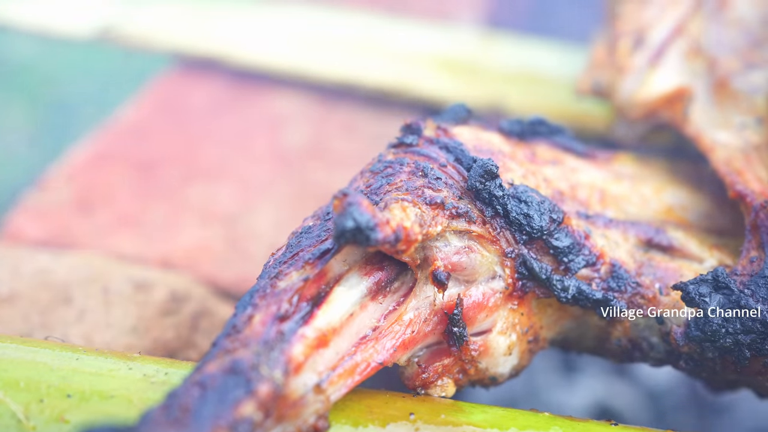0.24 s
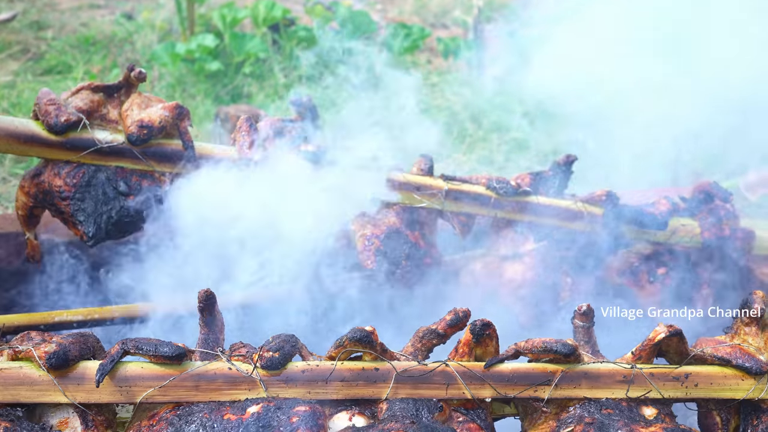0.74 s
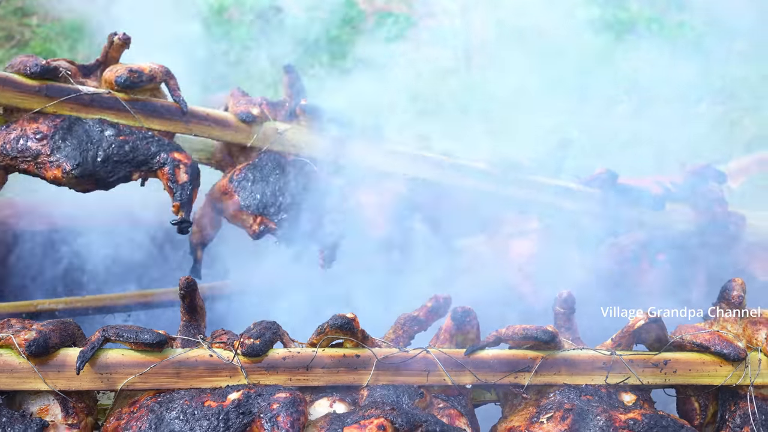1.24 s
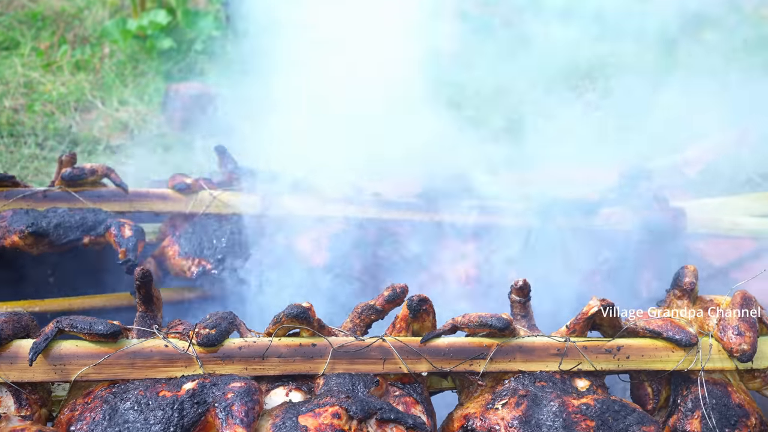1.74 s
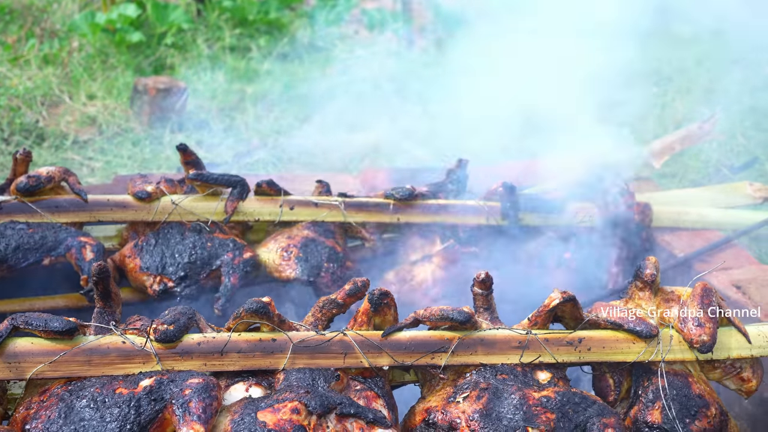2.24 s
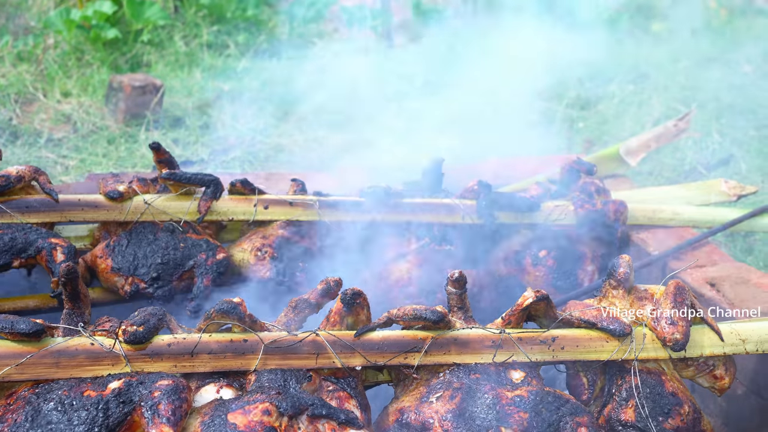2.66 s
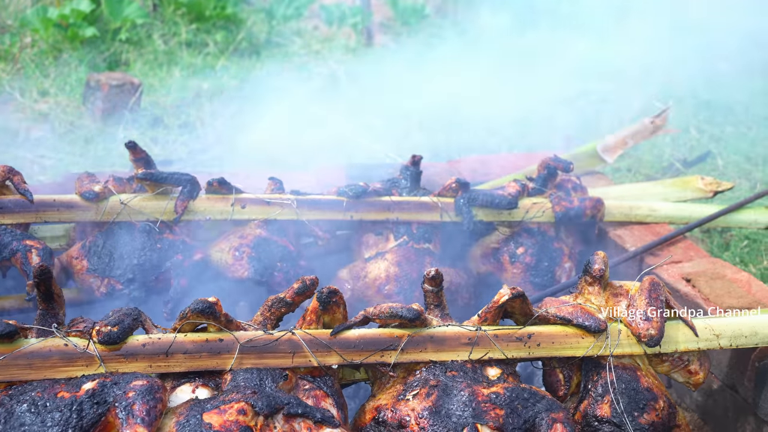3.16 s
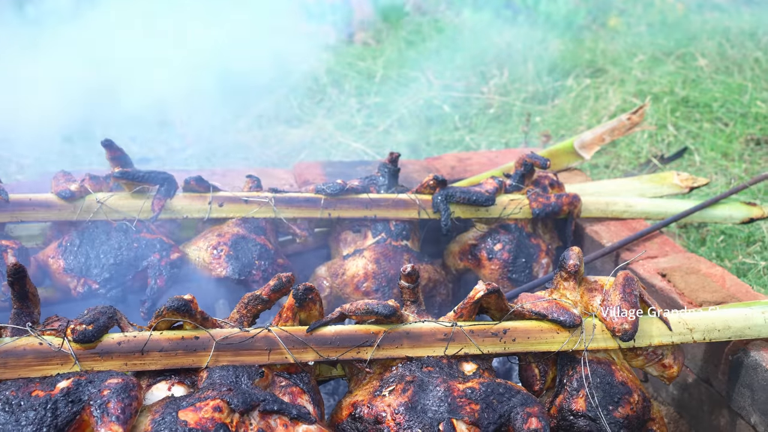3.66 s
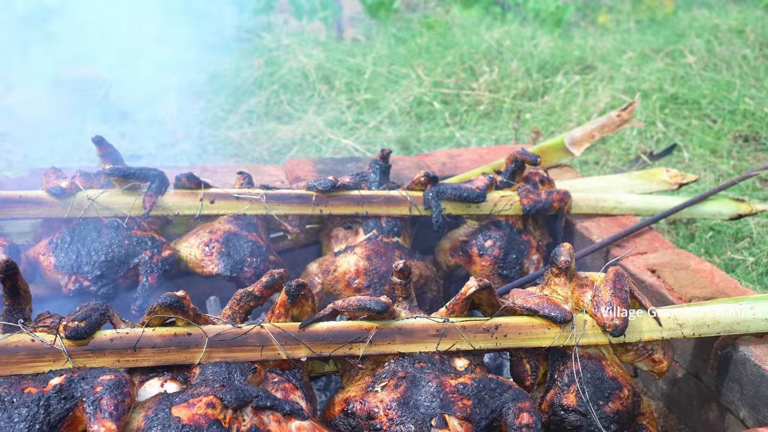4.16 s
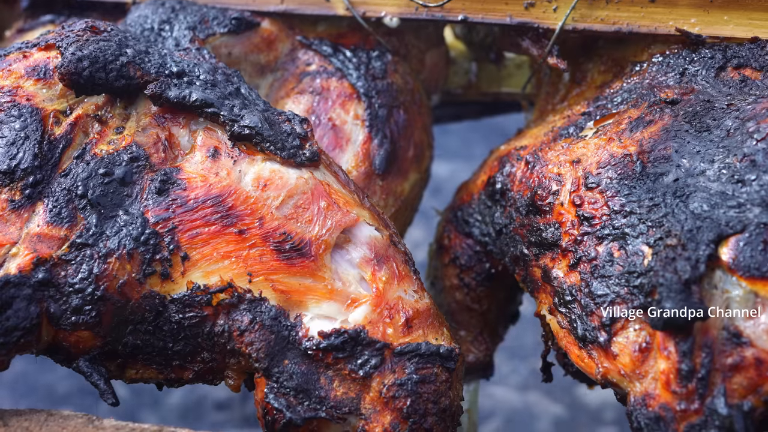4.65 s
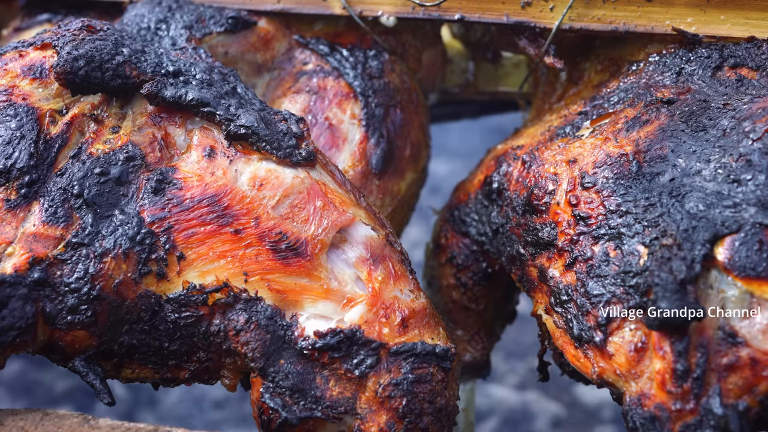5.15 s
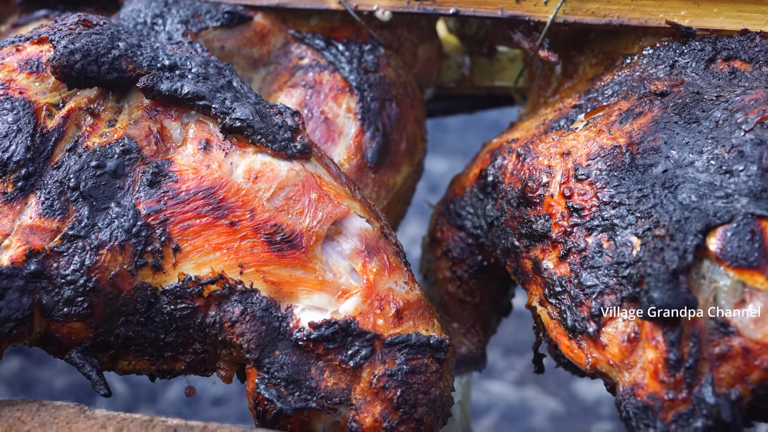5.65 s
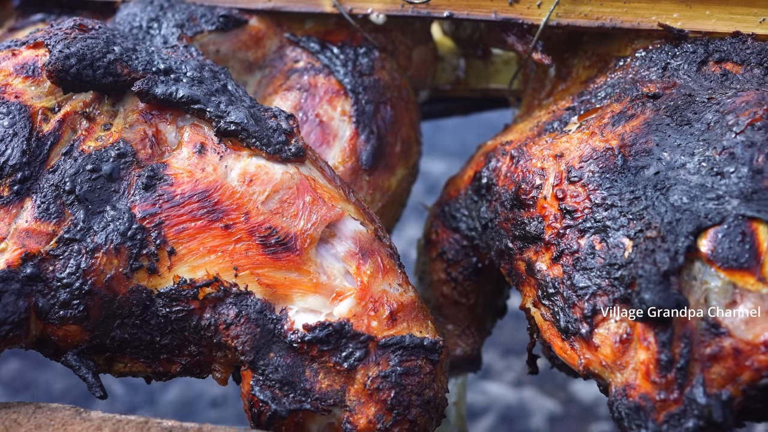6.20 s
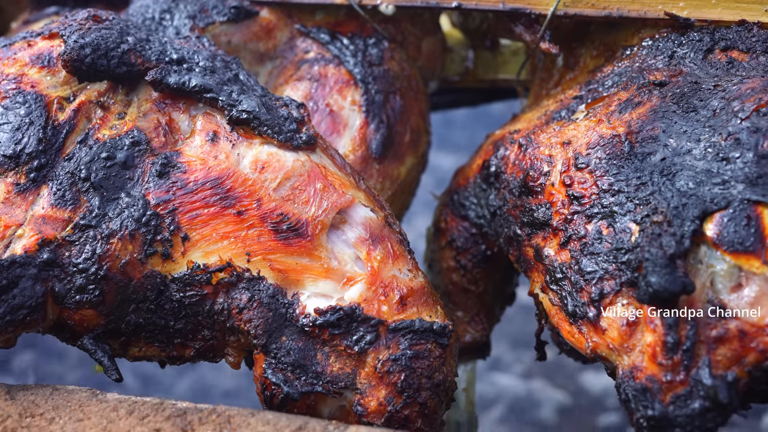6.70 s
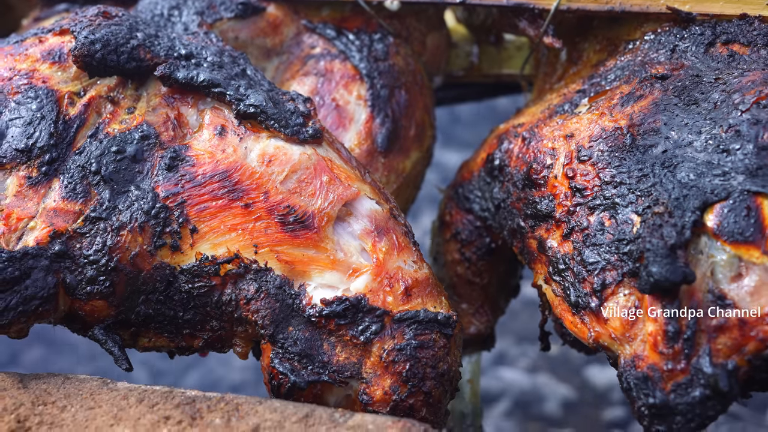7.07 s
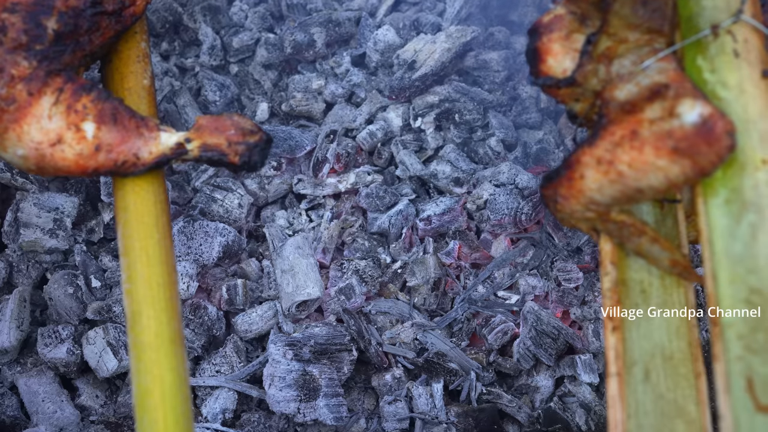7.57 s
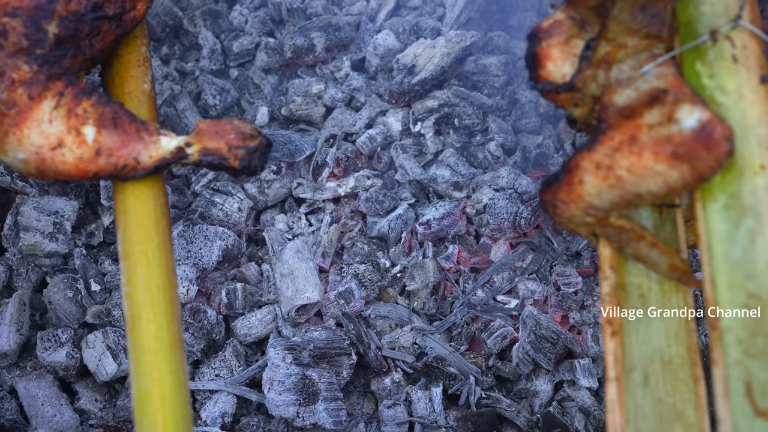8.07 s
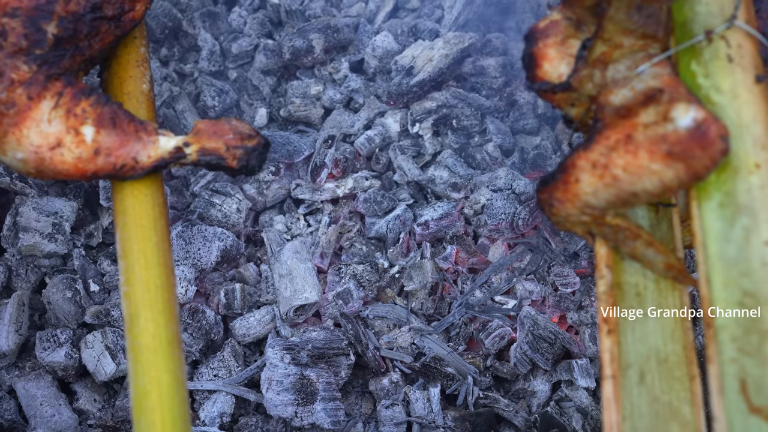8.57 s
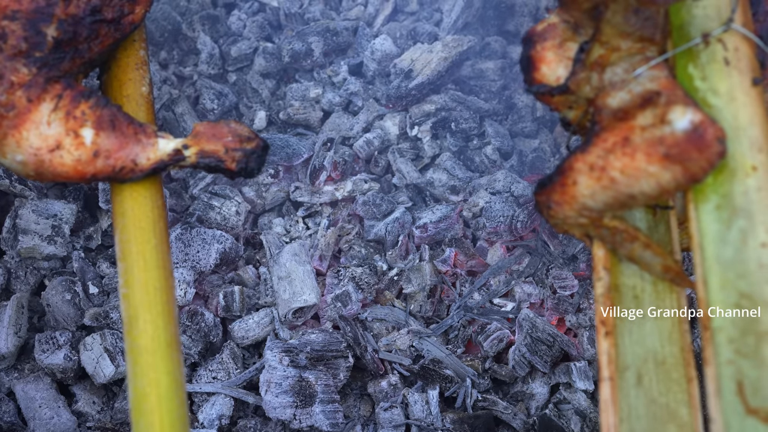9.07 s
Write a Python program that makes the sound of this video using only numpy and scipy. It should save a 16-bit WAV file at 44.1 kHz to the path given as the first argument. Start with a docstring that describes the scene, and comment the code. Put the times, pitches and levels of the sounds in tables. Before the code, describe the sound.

Outdoors, close to chickens roasting over charcoal, fat and juice sizzle without pause: a crisp, flickering hiss filled with tiny crackles. From 0 to 0.65 s it is moderate, with a dense run of snapping pops and low wind rumble. At 0.65 s it abruptly becomes a little quieter and thinner, with sparser pops; around 3 s brighter spits cluster and the fizz flares, while wind gusts thicken to 4 s. At 4.2 s a louder, fuller sizzle cuts in, with a brief rough, wet bubbling spatter near 4.7 s, sharp snaps and short surges around 5.9 to 6.2 s, under strong buffeting. A bright, hard pop lands near 7.2 s. At 7.3 s a soft low thump marks the last change, to a lower-level but fizzier sizzle with frequent pops, a surge at 7.8 s and a sharp snap near 8.9 s. Wind rumbles on, easing by 9.3 s.

```python
"""Fat and juice boil on chickens roasting over charcoal outdoors, heard from four spots in turn.
The sizzle is hiss plus tiny crackling bursts, flickering octave by octave and coloured anew at each spot.
Louder pops are clicks with an echo and a noisy tail; one spatter of juice is rough, loosely pitched bursts.
Wind buffets the microphone: a low rumble and a faster flutter of shaped noise.
One soft low thump, a short smooth pulse, falls at the cut to the last spot."""
import sys
import numpy as np
from scipy import signal
from scipy.fft import rfft, irfft, next_fast_len
from scipy.io import wavfile
from scipy.ndimage import uniform_filter1d

SR = 44100
rng = np.random.default_rng(int(sys.argv[2]) if len(sys.argv) > 2 else 0)


def dump(signal):
    """Clip the signal to [-1, 1] and save it as 16-bit WAV at the path in sys.argv[1]."""
    limited = np.clip(np.atleast_2d(signal).T, -1, 1)
    pcm = np.round(limited * 32767).astype(np.int16)
    wavfile.write(sys.argv[1], SR, pcm)


N = 411894

# When each spot begins, then the end: (time [s])
SPOT_TIMES = [0, .648, 4.233, 7.317, 9.35]
SNAP_HZ = [2500, 7000]   # the middle band, in which sizzle and snaps are levelled


def from_db(db):
    """Decibels to gain."""
    return 10 ** (np.asarray(db) / 20)


def rms_one(x):
    """Scaled to unit rms."""
    return x / np.sqrt(np.mean(x ** 2) + 1e-20)


def evened(x, size):
    """Divided by its own slow level, smoothed twice over size samples."""
    power = uniform_filter1d(uniform_filter1d(x ** 2, size=size), size=size)
    return x / np.sqrt(power)


def in_time(rows):
    """Curve columns at every sample."""
    s, *columns = np.transpose(rows)
    return [np.interp(np.arange(N) / SR, s, c) for c in columns]


def bin_hz(size):
    """Frequencies of an FFT of that size, kept at 1 Hz or above."""
    return np.maximum(np.arange(size // 2 + 1) * SR / size, 1)


def coloured(x, spectrum):
    """Filtered to a spectrum drawn on a log-frequency axis."""
    size = next_fast_len(len(x))
    hz, db = np.transpose(spectrum)
    gain = from_db(np.interp(np.log(bin_hz(size)), np.log(hz), db))
    return irfft(rfft(x, size) * gain, size)[:len(x)]


def band(x, edges_hz):
    """Causal band-pass along the last axis."""
    return signal.sosfilt(signal.butter(2, edges_hz, "band", fs=SR, output="sos"), x)


def peak(x, hz, width_hz):
    """One resonance, gain 1 on top."""
    r, w = np.exp(-np.pi * width_hz / SR), 2 * np.pi * hz / SR
    return (1 - r * r) / 2 * signal.lfilter([1, 0, -1], [1, -2 * r * np.cos(w), r * r], x)


def drift(rate_hz):
    """Slow chance of spread 1: noise at every 40th sample through a double one-pole low-pass."""
    r = np.exp(-80 * np.pi * rate_hz / SR)
    noise = rng.standard_normal(N // 40 + 2002)
    slow = signal.lfilter([1], [1, -2 * r, r * r], noise)[2000:]   # the filter has settled by then
    return np.interp(np.arange(N) / 40, np.arange(len(slow)), rms_one(slow))


def crackle(per_s, spread_db, tail_s):
    """Random bursts of uneven size, each a puff of noise that dies fast; rms 1."""
    born = rng.random(N) < per_s / SR
    sizes = from_db(spread_db * np.minimum(rng.exponential(1, N), 2.5))
    decay = np.exp(-1 / (tail_s * SR))
    envelope = signal.lfilter([1], [1, -decay], born * sizes + 1e-18)
    return rms_one(envelope * rng.standard_normal(N))


def puffs(t60, noisy, echo_s):
    """One row a burst: a click, its echo off a nearby surface and a noisy tail."""
    t = np.arange(2048) / SR
    tails = np.exp(-np.log(1000) * t / np.maximum(t60, .002)[:, None])
    noise = rng.standard_normal((len(t60), len(t)))
    # each burst lies at its own distance: half to twice the echo time
    lags = (echo_s * SR * 2 ** np.tanh(noise[:, -1])).astype(int)
    rows = noisy * tails * noise
    rows[:, 0] -= 1
    rows[np.arange(len(t60)), lags] -= .6
    return rows


def laid_out(times, rows):
    """Each row placed at its moment."""
    out = np.zeros(N + rows.shape[1])
    for s, row in zip(times, rows):
        start = round(s * SR)
        out[start:start + len(row)] += row
    return out[:N]


def wind():
    """Slow pressure lumps on the microphone and a faster flutter, its level uneven within each gust."""
    # The gusts at the microphone: (time [s], buffeting level [dB], flutter level [dB])
    gusts = [(0.0, -24, -45), (0.08, -33.5, -45), (0.28, -18, -38.5), (0.57, -23.5, -40.5),
             (0.68, -30.5, -49), (0.76, -24.5, -49), (0.99, -40, -61), (1.38, -57, -62), (1.48, -30, -57),
             (1.6, -35, -62), (1.8, -21.5, -43), (2.13, -22.5, -45), (2.21, -46, -52), (2.31, -25.5, -49),
             (2.46, -29, -46), (2.53, -21.5, -36), (2.73, -22, -44), (2.96, -17.5, -40), (3.13, -40, -55),
             (3.23, -25, -43), (3.33, -12.5, -34), (3.41, -19, -42), (3.61, -18.5, -43), (3.72, -15, -33),
             (3.87, -28, -50), (4.0, -16.5, -49), (4.14, -22, -41), (4.26, -44, -55), (4.58, -52, -50),
             (4.66, -31, -51), (4.9, -54, -53), (5.03, -22, -45), (5.14, -42, -48), (5.23, -25, -47),
             (5.44, -33, -44), (5.56, -20, -37), (5.7, -25, -44), (5.83, -14, -28), (5.93, -14, -31),
             (6.03, -31, -30), (6.19, -10.5, -27.5), (6.35, -17, -40), (6.47, -33.5, -49),
             (6.8, -32.5, -46), (6.89, -15, -42), (7.16, -26, -49), (7.27, -20, -39), (7.44, -17, -41),
             (7.54, -26, -45), (7.67, -12, -35.5), (7.8, -17.5, -29.5), (7.95, -16.5, -39),
             (8.03, -22, -37), (8.14, -20, -37), (8.27, -24.5, -39), (8.4, -16, -33), (8.56, -29.5, -43),
             (8.76, -19.5, -42.5), (8.85, -32, -42), (8.96, -27, -52), (9.05, -35, -65), (9.34, -49, -56)]
    # Spectra of the rumble and of the flutter, before levelling: (frequency [Hz], relative level [dB])
    buffet_spectrum = [(2.9, -59), (5.0, 8), (21, 3.5), (30, -12.5), (55, -19.5), (72, -18), (120, -120)]
    flutter_spectrum = [(26, -30), (45, 5.5), (158, -15.5), (238, -28.5), (300, -42), (390, -66),
                        (660, -120)]
    buffet_db, flutter_db = in_time(gusts)
    buffet = evened(coloured(rng.standard_normal(N), buffet_spectrum), size=4000)
    flutter = evened(coloured(rng.standard_normal(N), flutter_spectrum), size=2500)
    eddies_db = 0.5 * drift(rate_hz=13)
    return from_db(buffet_db) * buffet + from_db(flutter_db + eddies_db) * flutter


def thump():
    """One soft low thump at the cut to the last spot: a quick swell and a slower swing back."""
    start_s, scale_db, corner_hz = 7.312, -22, 90
    t = np.arange(N) / SR - start_s
    rise = np.clip(2 * np.pi * corner_hz * t, 0, 30)   # time constants since the start
    swell = np.e * rise * np.exp(-rise)
    return from_db(scale_db) * swell * (1 - 0.43 * rise)


def drips():
    """Juice spattering on the embers as large bubbles: rough bursts ringing loosely near their pitch."""
    # Bubbles of one spatter: (time [s], peak level [dB], nominal pitch [Hz], 60 dB decay of the tail [s])
    bubbles = [(4.712, -29, 960, .03), (4.727, -22, 540, 0.014), (4.729, -23, 1060, .018),
               (4.744, -28, 577, 0.042), (4.764, -32, 463, 0.032), (4.766, -27, 950, 0.03),
               (4.788, -26, 1050, 0.031)]
    s, peak_db, hz, t60 = np.transpose(bubbles)
    source = puffs(t60, noisy=0.26, echo_s=0.0015)
    rows = np.array([band(row, [f / 1.21, f * 1.1]) for row, f in zip(source, hz)])
    gain = from_db(peak_db) / np.abs(rows).max(axis=1)
    return laid_out(s, rows * gain[:, None])


def spot_index():
    """Which spot the microphone is at, sample by sample."""
    return np.searchsorted(SPOT_TIMES[1:-1], np.arange(N) / SR, side="right")


def sizzle_db(axis=0):
    """One column of the sizzle's tables, at the current spot."""
    # The sizzle, one table a spot: (time [s], middle-band base level [dB], extra of the lower sizzle [dB])
    levels_by_spot = [
        [(0, -38.5, -1.5), (.3, -39, 1), (.648, -39.5, 3.5)],
        [(.648, -42.5, -2.5), (1.0, -42, -1), (1.4, -41.5, -3), (1.85, -40.5, 0.5), (2.4, -41.5, 0.5),
         (2.75, -40.5, 0), (3.05, -42.5, 0), (3.65, -42.5, 2.5), (3.9, -41, 0), (4.233, -43.5, 5.5)],
        [(4.233, -35, -6), (4.4, -35, -6), (4.85, -34.5, -1.5), (5.3, -34, -5.5), (5.6, -35, -3),
         (6.05, -35.5, -3), (6.45, -36.5, -2.5), (6.82, -36, -4), (7.1, -35, -3.5), (7.317, -34.5, -4.5)],
        [(7.317, -43, 7), (7.55, -37.5, 0.5), (7.7, -40.5, 5.5), (7.95, -38, 3.5), (8.25, -40.5, 4),
         (8.45, -40.5, 3.5), (8.75, -39, 1.5), (9.0, -38.5, 1), (9.34, -40.5, 2)],
    ]
    return np.choose(spot_index(), [in_time(rows)[axis] for rows in levels_by_spot])


def small_pops():
    """Rows for the fainter pops, falling at random, their strength riding on the sizzle."""
    # Rows: snap over the sizzle, body over the snap, spit over the snap: (centre [dB], spread [dB])
    offsets = [(1, 0), (-6, 5), (-3.5, 6.5)]
    count = 55
    centre_db, spread_db = np.transpose(offsets)
    s = rng.uniform(0, N / SR, count)
    chance = np.clip(rng.standard_normal((count, 3)), -2, 1.5)
    levels = centre_db + spread_db * chance
    levels[:, 0] += sizzle_db()[(s * SR).astype(int)]
    return np.column_stack([s, levels])


def pops():
    """Pockets of steam burst in a low body, a snap and a bright spit, each levelled over its first 3 ms."""
    # Louder pops of fat and charcoal:
    # (time [s], snap level [dB], body over the snap [dB], spit over the snap [dB])
    loud_pops = [(0.101, -30, -13, -10), (0.176, -30.5, -7, -12), (0.2158, -36, -8, 6),
                 (0.237, -38.5, -4, 7), (0.317, -31, -19, -7), (0.443, -27, -6.5, -9),
                 (0.4914, -32.5, -6, -2), (0.512, -38.5, 8.5, 2), (0.5482, -29, -20, -8),
                 (0.5641, -38.5, 11.5, -4), (0.6192, -32.5, -12, 0), (0.6288, -27, -16, -17),
                 (0.786, -35.5, -18, -8), (0.8456, -40, -2, 4), (0.865, -36.5, -15, 0),
                 (1.0414, -34, -8, -1), (1.5321, -26.5, -16, -21), (1.6167, -31.5, -9, -21),
                 (1.9073, -39, 4, -22), (2.226, -30.5, -2.5, -17), (2.442, -35, -31, -4),
                 (2.5624, -48, -13, -6), (2.915, -38, -2, 5), (2.9467, -37, -4, 10), (2.958, -41.5, 0, 14),
                 (2.9726, -30, -18, 8), (3.132, -32.5, -16, -11), (3.3859, -37, -15, -1),
                 (3.615, -37, -19, -16), (3.7132, -31.5, -28, -13), (4.0996, -30, -5, -23),
                 (4.1454, -34.5, -1, -16), (4.182, -32, 0, -12), (4.2853, -34, -9, 7), (4.349, -36, -10, 5),
                 (4.3824, -33, 3, -5), (4.439, -39, 8, -5), (4.7282, -23.5, -6, -19), (4.7916, -33, -3, 3),
                 (5.064, -33, -11, 1), (5.175, -29, -17, -10), (5.2032, -35, -13, -9),
                 (5.2322, -28.5, -38, -5), (5.2594, -24, -18, -10), (5.498, -32, -1, -8),
                 (5.5937, -42.5, 13.5, -5), (5.7343, -30, -13, -16), (6.021, -27.5, -21, -9),
                 (6.1419, -26, -3, -11), (6.2864, -35, 4, -11), (6.6113, -29, -4, -6),
                 (6.987, -30, -10, -5), (7.0315, -29, 0, -2), (7.1385, -32, 7, -3), (7.1532, -28, -7, -9),
                 (7.1737, -22, -9, 7), (7.3464, -32, -2.5, -21), (7.4459, -35.5, 3.5, -12),
                 (7.545, -37, -16, -3), (7.743, -41, 9, -4), (7.768, -27, -1.5, -5), (7.8331, -30, -11, -3),
                 (7.8682, -28, -3, -7), (7.9455, -30.5, -0.5, -7), (7.9789, -32, -5, -6),
                 (8.0745, -34.5, -6, -2), (8.1157, -34.5, 0.5, -3), (8.3432, -32, -5, -8),
                 (8.4039, -29.5, -19, -3), (8.4377, -34.5, -3, 3), (8.5188, -44, -10, 12),
                 (8.5649, -39, -8, 1), (8.6042, -44, 8, 2), (8.6603, -30.5, -18, 1),
                 (8.8203, -36, 3.5, -10), (8.8705, -24.5, -7, -14), (9.0389, -29.5, -9, -2),
                 (9.0662, -29.5, -21, -2)]
    s, snap_db, body_db, spit_db = np.vstack([loud_pops, small_pops()]).T
    t60 = .0095 * from_db(.25 * (snap_db + 30))   # bigger pockets of steam hiss out longer
    dry_puffs = puffs(t60, noisy=.33, echo_s=.0004)
    # two resonances of the microphone colour the pops, the upper one broader
    source = (dry_puffs + from_db(10.5) * peak(dry_puffs, hz=9030, width_hz=1140)
              + from_db(-1) * peak(dry_puffs, hz=14300, width_hz=2700))
    rows = 0
    for range_hz, over_snap_db in [([750, 2500], body_db), (SNAP_HZ, 0 * s), ([7000, 17000], spit_db)]:
        part = band(source, np.multiply(range_hz, [1.25, .95]))   # narrowed: the parts stay distinct
        early = np.sqrt(np.mean(part[:, :130] ** 2, axis=1))
        gain = from_db(snap_db + over_snap_db) / early
        rows = part * gain[:, None] - rows   # signs alternate, so the bands join
    return laid_out(s, rows)


def flares():
    """Pockets of fat flare up, swelling and fading smoothly: gain and extra of the top fizz, dB."""
    # Flares, summed where they overlap:
    # (peak time [s], swell [s], fade [s], gain [dB], extra of the top fizz [dB])
    fat_pockets = [(.6, 0.056, 0.064, 2.5, -2), (2.1, .06, 0.16, 2, -1.5), (2.96, 0.23, 0.024, 0.5, 5),
                   (3.18, 0.076, 0.17, 2.5, 3.5), (3.43, 0.035, 0.061, 1.5, -0.5),
                   (4.74, .06, 0.06, 2.5, -2), (5.0, 0.1, 0.14, 0.5, 1.5), (5.86, 0.15, 0.14, 2.5, -1),
                   (6.134, 0.05, 0.039, 4.5, -2), (6.24, .04, 0.029, 4.5, -1.5),
                   (6.92, 0.073, 0.27, 2.5, 2.5), (7.78, 0.041, 0.052, 4, -3.5), (8.35, 0.04, 0.031, 1, -2)]
    t = np.arange(0, N + 64, 64) / SR
    s, swell, fade, db, top_db = np.transpose(fat_pockets)[:, :, None]
    shape = np.exp(-2 * ((t - s) / np.where(t < s, swell, fade)) ** 2)
    gain_db, bright_db = (db * shape).sum(axis=0), (top_db * shape).sum(axis=0)
    return in_time(np.transpose([t, gain_db, bright_db]))


def bubbling(low_db, top_db):
    """Hiss plus crackles; each octave has bursts of its own and flickers partly alone."""
    size = next_fast_len(N)
    octave = np.clip(np.log2(bin_hz(size) / 500), 0, 5)   # octaves above 500 Hz
    common = rng.standard_normal(N) + from_db(-4.5) * crackle(500, spread_db=3.5, tail_s=0.00046)
    together, out = drift(33), np.zeros(N)
    for k in range(6):
        share = np.clip(1 - abs(octave - k), 0, 1)   # neighbouring octaves crossfade
        source = common + from_db(-9.5) * crackle(150, spread_db=3.0, tail_s=0.0012)
        # the lower extra fades out by 4 kHz; the top extra lifts the two highest octaves
        tilt_db = low_db * max(1 - k / 3, 0) + top_db * (k > 3)
        flicker_db = 0.54 * together + 0.52 * drift(16)
        part = irfft(rfft(source, size) * share, size)[:N]
        out += from_db(tilt_db + flicker_db) * part
    return out


def sizzle():
    """Boiling fat and juice: the bubbling, coloured at each spot and levelled by its middle band."""
    # Colour of the sizzle, one table a spot, before levelling: (frequency [Hz], relative level [dB])
    colours = [
        [(140, -14), (240, -2), (262, -3.5), (306, -7.5), (554, -11), (637, -7), (1080, -0.5), (1780, -0.5),
         (3980, -3), (4990, 0.5), (9190, 0), (15500, -8.5)],
        [(180, -4.5), (300, -8.5), (543, -15.5), (808, -3), (1110, -2.5), (1590, -3), (2830, -5.5), (5210, -2),
         (6900, -5.5), (8840, 0), (9930, -5.5), (11100, -11), (13600, -4), (15500, -9)],
        [(140, 0), (240, -3.5), (301, -7), (935, 0), (1210, -1.5), (1780, -0.5), (3520, -2.5), (3910, -5),
         (4490, -1.5), (7200, -6), (8720, -2.5), (10700, -10), (14200, -8), (15500, -10.5)],
        [(180, -5), (300, -4.5), (562, -12), (731, -5.5), (835, -4), (1160, 2.5), (1870, -3), (2650, 1.5),
         (3690, 0.5), (6050, 0), (8990, -1.5), (10600, -7), (14500, -5.5), (15500, -9)],
    ]
    # Extra of the top fizz at each spot: (level [dB])
    fizz_by_spot = [.5, .8, 1.5, 4.5]
    flare_db, bright_db = flares()
    # lower sizzle wanders most by chance, overall level and top fizz by a share of that
    wander_db, wander_hz = .7, 9
    level_db = sizzle_db() + flare_db + wander_db * 0.46 * drift(wander_hz)
    low_db = sizzle_db(axis=1) + wander_db * drift(wander_hz)
    top_db = np.array(fizz_by_spot)[spot_index()] + bright_db + wander_db * 0.32 * drift(wander_hz)
    out = bubbling(low_db, top_db)
    edges = np.minimum(np.round(np.array(SPOT_TIMES) * SR).astype(int), N)
    spots = []
    for a, b, colour in zip(edges, edges[1:], colours):
        x = coloured(out[a:b], colour)
        spots.append(x / np.std(band(x, SNAP_HZ)))
    return from_db(level_db) * np.concatenate(spots)


def scene():
    """Wind, thump, drips, pops and sizzle at one microphone."""
    return (wind() + thump() + drips() + pops() + sizzle())[None]


def record(dry):
    """The top is cut steeply above 15.85 kHz."""
    return signal.sosfilt(signal.ellip(12, .5, 75, 15850, fs=SR, output="sos"), dry)


dry = scene()
out = record(dry)
dump(out)
```